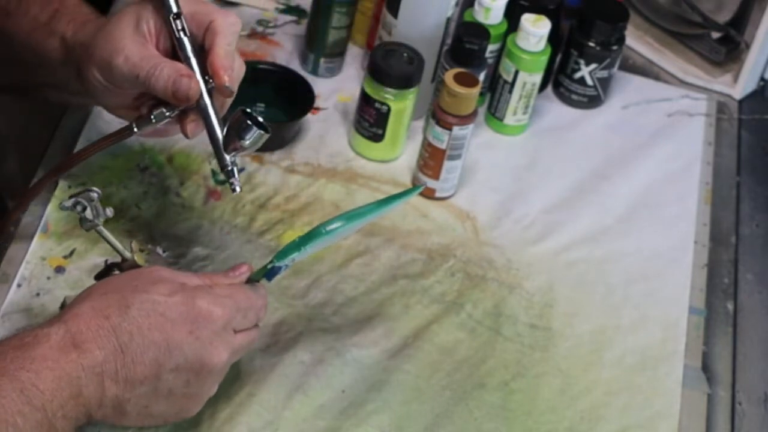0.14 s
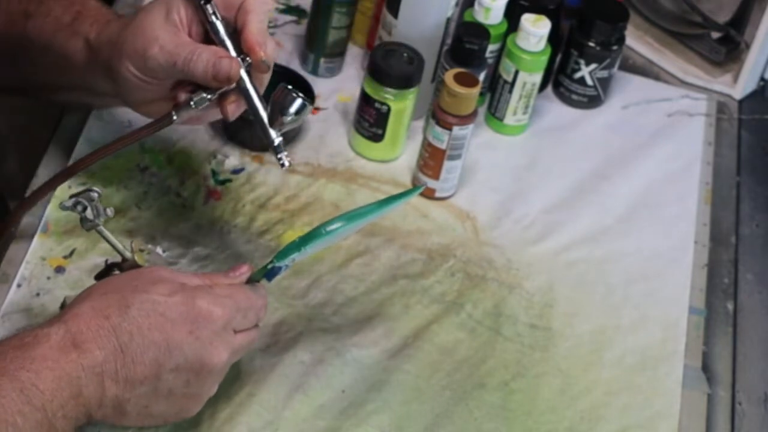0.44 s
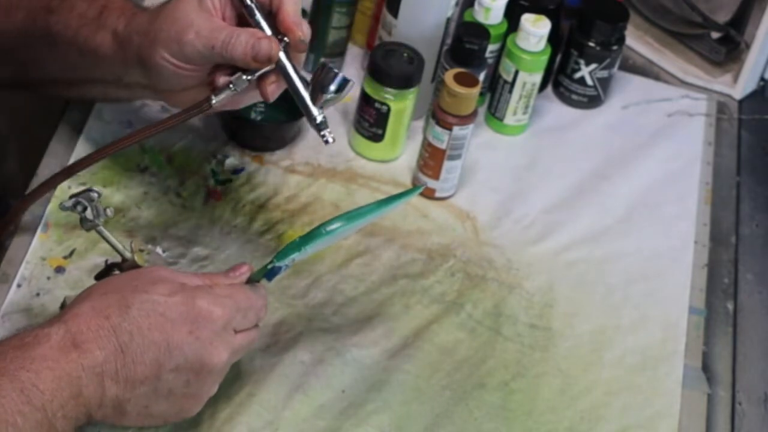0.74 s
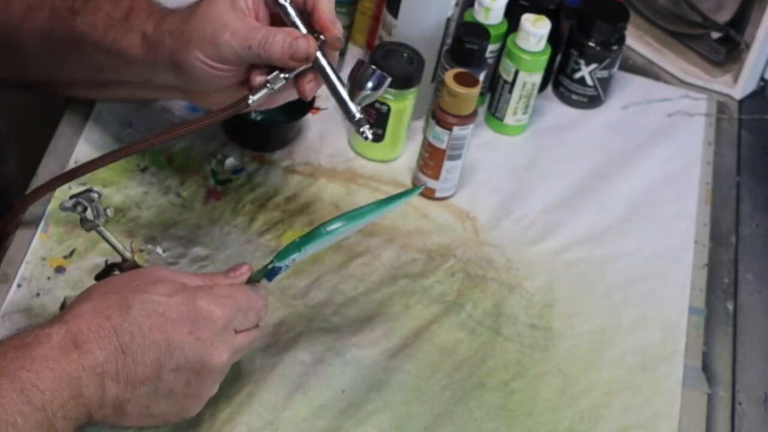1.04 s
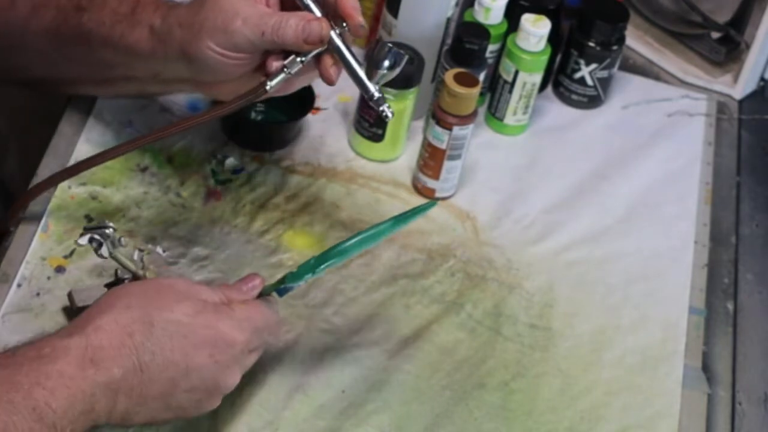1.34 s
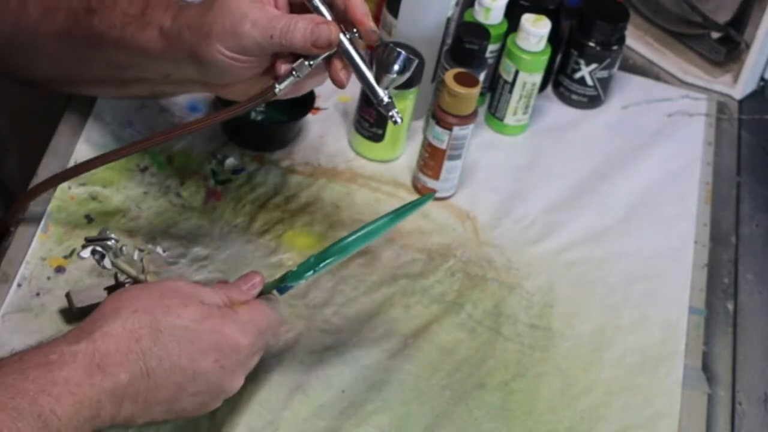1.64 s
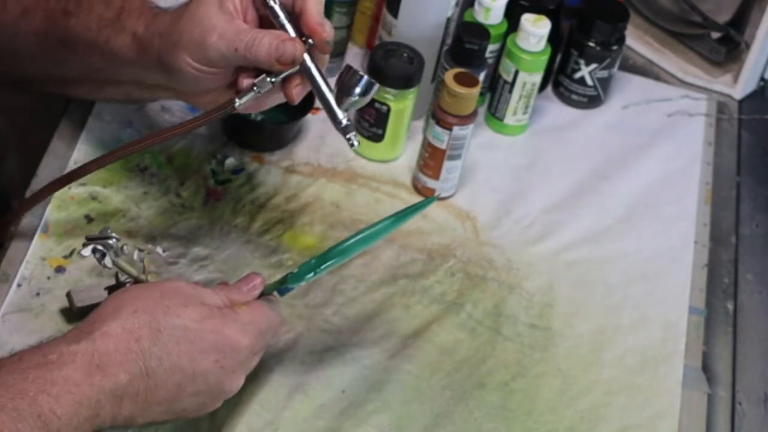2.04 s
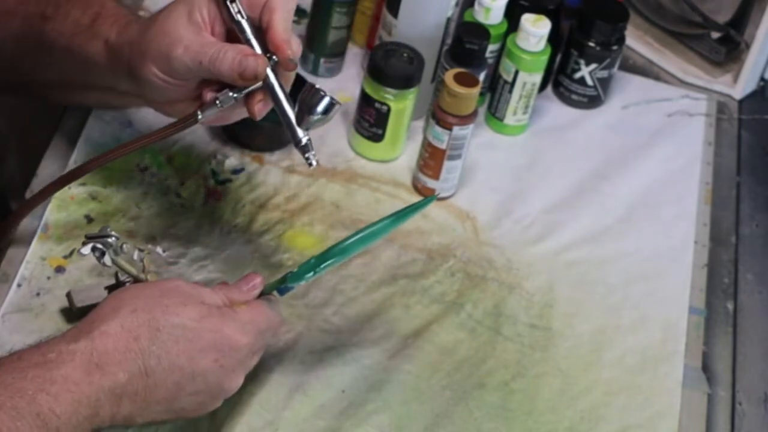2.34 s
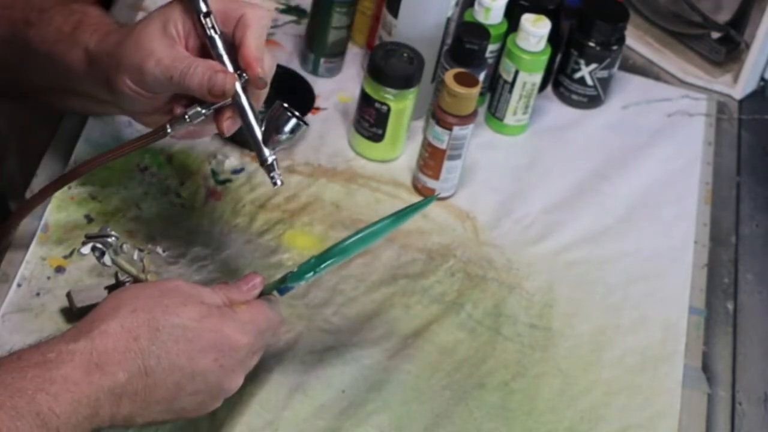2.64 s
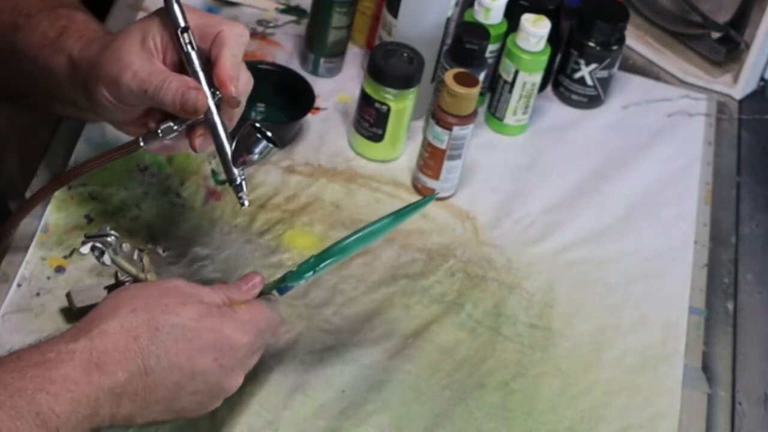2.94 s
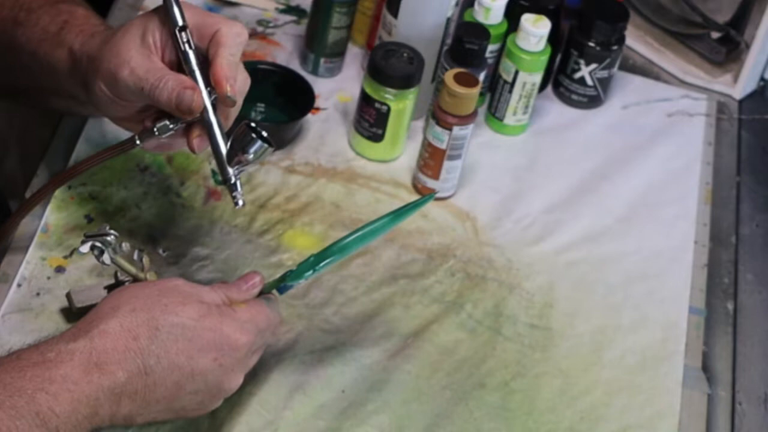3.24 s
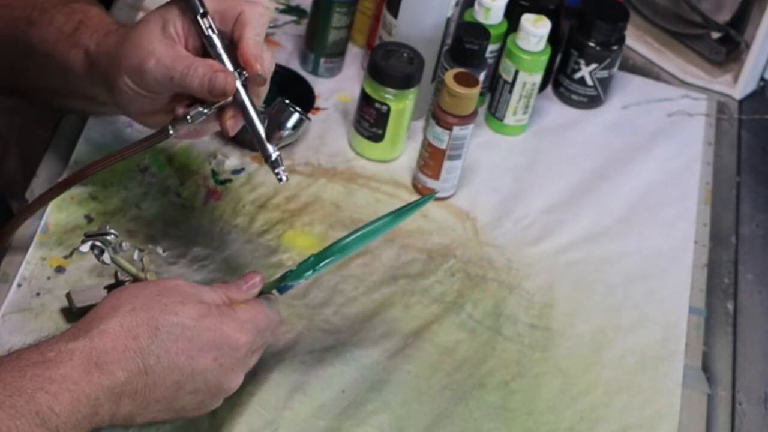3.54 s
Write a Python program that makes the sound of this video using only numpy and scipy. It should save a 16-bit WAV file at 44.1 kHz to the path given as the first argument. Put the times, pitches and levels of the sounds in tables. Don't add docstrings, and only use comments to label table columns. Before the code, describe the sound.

An airbrush hisses steadily, cuts out briefly, then resumes, over a small compressor's rattling buzz.

```python
import sys
import numpy as np
from scipy import signal
from scipy.fft import rfft, irfft
from scipy.io import wavfile

SR = 44100
rng = np.random.default_rng(int(sys.argv[2]) if len(sys.argv) > 2 else 0)


def natural_amplitude(level_db):
    exponent = np.asarray(level_db, float) / 20
    return 10 ** exponent


def unload_audio(sound):
    columns = np.transpose(np.atleast_2d(sound))
    steps = np.round(np.clip(columns, -1, 1) * 32767)
    wavfile.write(sys.argv[1], SR, steps.astype(np.int16))


N = 163170
T = np.arange(N) / SR
HZ = np.maximum(np.arange(N // 2 + 1) * SR / N, 1)
CUTOFF_HZ = 15780


def rms_one(x):
    return x / np.sqrt(np.mean(x ** 2))


def at_hz(points):
    hz, db = np.transpose(points)
    return natural_amplitude(np.interp(np.log(HZ), np.log(hz), db))


def bell(hz, width_hz):
    return 1 / (1 + (2 * (HZ - hz) / width_hz) ** 2)


def dips_and_lifts(resonances):
    return natural_amplitude(sum(db * bell(hz, width_hz) for hz, width_hz, db in resonances))


def drift(rate):
    r = np.exp(-80 * np.pi * rate / SR)
    slow = signal.lfilter([1], [1, -2 * r, r * r], rng.standard_normal(N // 40 + 1102))[1100:]
    return np.interp(np.arange(N) / 40, np.arange(len(slow)), rms_one(slow))


def noise(shape, flicker_db):
    white = rfft(rng.standard_normal(N)) * shape
    octave = np.log2(HZ / 40)
    total = np.zeros(N)
    for k in range(10):
        band = irfft(white * np.clip(1 - abs(octave - k), 0, 1), N)
        total += band * natural_amplitude(flicker_db * drift(9.3))
    return rms_one(total)


def ring(x, hz, width_hz):
    r, w = np.exp(-np.pi * width_hz / SR), 2 * np.pi * hz / SR
    poles = [1, -2 * r * np.cos(w), r * r]
    once = signal.lfilter([0, np.sin(w)], poles, x + 1e-18)
    return signal.lfilter([0, 2 * np.e * (1 - r) * np.sin(w)], poles, once)


# frequency in Hz, level in dB per Hz.
ROOM = [(25, 1), (60, -9), (200, -8), (1000, -11), (4000, -21), (16000, -32.5)]


def room():
    whine = natural_amplitude(-84) * np.sin(2 * np.pi * 14820 * T)
    return natural_amplitude(-56.5) * noise(at_hz(ROOM), flicker_db=1.0) + whine


MAINS_HZ = 60


def mains_hum():
    peak_s, rise_s, fall_s = 0.315, 0.045, 0.042
    surge = np.exp(-np.where(T < peak_s, (peak_s - T) / rise_s, (T - peak_s) / fall_s))
    hum = 2 * np.pi * MAINS_HZ * T
    return -natural_amplitude(-62 + 4) * np.cos(hum) - natural_amplitude(-43.5) * surge * np.sin(2 * hum)


# time in seconds, peak level in dB.
SPARKS = [
    (.124925, -8.5),
    (.125006, -.7),
    (.125488, -2.2),
]


def switch():
    width_s, rebound_db, rebound_s = .0000145, -27, .003
    snaps = sum(-natural_amplitude(db) * np.exp(-.5 * ((T - s) / width_s) ** 2) for s, db in SPARKS)
    after = np.clip(T - SPARKS[-1][0], 0, 1)
    return snaps + natural_amplitude(rebound_db) * (after > 0) * np.exp(-after / rebound_s)


START_S, STOP_S = .235, 3.607
# time in seconds, turns per second.
SPEED = [(.27, 28.55), (.6, 28.76), (1.2, 28.82), (2, 28.83), (2.4, 28.88), (2.9, 28.83), (3.7, 28.73)]


def shaft_turns():
    knock_s = 1.9368
    turns = np.cumsum(np.interp(T, *np.transpose(SPEED))) / SR
    return turns - np.interp(knock_s, T, turns)


# frequency in Hz, width in Hz, change in dB.
VALLEYS = [(315, 54, -8), (480, 64, -7.5), (596, 23.3, -19.5)]
# frequency in Hz, width in Hz, change in dB.
SECOND_VALLEY = (718, 24, -7)


def housing_valleys():
    return dips_and_lifts(VALLEYS + [SECOND_VALLEY])


# share of the turn after the main knock, level in dB,
# ring frequency in Hz, ring width in Hz.
VALVES = [
    (-.032, -27.8, 953, 186),
    (.222, -46, 996, 60),
    (.406, -39.1, 905, 63),
    (.731, -43.9, 1016.5, 60),
    (.858, -36.5, 750, 258),
]
# frequency in Hz, width in Hz, level in dB.
HOUSING = [(385.5, 32, -49), (549.5, 16, -58.5), (1064, 47, -51)]
# frequency in Hz, width in Hz, level in dB.
COLD_RING = [(747, 57, -42.5), (883, 48, -43.5)]


def valve_knocks(turns, cold, valleys):
    gain_db, scatter_db, jitter_s, cold_sag, top_hz = -0.5, 1.4, .00003, 0.019, 1300
    whole = np.arange(np.ceil(turns[0]), np.interp(STOP_S, T, turns))
    out = np.zeros(N)
    for k, (share, db, hz, width_hz) in enumerate(VALVES):
        luck = rng.standard_normal((len(whole), 2))
        at = (np.interp(whole + share, turns, T) + jitter_s * luck[:, 0]) * SR
        clicks = np.bincount(at.astype(int).clip(0), natural_amplitude(scatter_db * luck[:, 1]), N)
        loaded = ring(clicks * (1 - cold), hz, width_hz)
        flat = ring(clicks * cold, hz * (1 - cold_sag), width_hz)
        out += natural_amplitude(db + gain_db) * (loaded + flat)
        if k == 0:
            out += sum(natural_amplitude(d) * ring(clicks, f, w) for f, w, d in HOUSING)
            slack = sum(natural_amplitude(d) * ring(clicks * cold, f, w) for f, w, d in COLD_RING)
    return irfft(rfft(out) * valleys / (1 + (HZ / top_hz) ** 20), N) + slack


# order (cycles per turn), level in dB,
# partner level in dB, partner lead in cycles.
SHAFT = [(2, -66, -80, 0), (3, -58, -66, -.03), (4, -62, -61, .3), (5, -58, -62, .24), (6, -59, -58, .06),
         (7, -72, -67, .47), (8, -71, -71, .06)]
# order (cycles per turn), level in dB.
HIGH_ORDERS = [(60, -72), (90, -73), (125, -76)]


def shaft_tones(turns, cold):
    lag_turns, smear, wander_db = .85, .11, 1.2
    slip = 2 * MAINS_HZ * T - 4 * turns
    out = np.zeros(N)
    for order, db, partner_db, lead in SHAFT:
        cycle = order * (turns - lag_turns) + smear * order ** 2
        out += natural_amplitude(db + 3 + wander_db * drift(1.5)) * np.cos(2 * np.pi * cycle)
        out += natural_amplitude(partner_db + 3) * np.cos(2 * np.pi * (cycle + slip + lead))
    whine_db = -48.5 + 1.5 - 8 * cold + wander_db * drift(3.3)
    out -= natural_amplitude(whine_db) * np.cos(2 * np.pi * 20 * turns)
    return out + sum(natural_amplitude(db + 3) * np.cos(2 * np.pi * order * turns) for order, db in HIGH_ORDERS)


# frequency in Hz, level in dB per Hz.
RATTLE = [(25, -3), (60, -10.5), (380, -0.5), (560, -1), (930, -2.5), (1290, -23.5), (3700, -29),
          (16000, -66)]


def intake_and_rattle(turns, valleys):
    pulse = natural_amplitude(2 * np.cos(2 * np.pi * (turns - .08)))
    intake = natural_amplitude(-51) * noise(bell(890, 170) * valleys, flicker_db=1.5)
    return pulse * intake + natural_amplitude(-54) * noise(at_hz(RATTLE) * valleys, flicker_db=1.2)


def starting_song():
    middle_s, width_s, hz = .3, .024, 972
    swell = np.exp(-.5 * ((T - middle_s) / width_s) ** 2)
    return natural_amplitude(-38) * swell * np.sin(2 * np.pi * hz * T)


# time in seconds, level in dB, ring frequency in Hz.
RUN_DOWN = [
    (3.620, -34, 933),
    (3.645, -39, 1026),
    (3.665, -42, 996),
]


def last_strokes():
    return sum(natural_amplitude(db) * ring(np.arange(N) == int(s * SR), hz, 97) for s, db, hz in RUN_DOWN)


def compressor():
    rise_s, fall_db_per_s, load_s = .075, 150, 0.49
    turns, valleys = shaft_turns(), housing_valleys()
    cold = np.exp(-np.clip(T - START_S, 0, 9) / load_s)
    running = valve_knocks(turns, cold, valleys) + shaft_tones(turns, cold)
    running += intake_and_rattle(turns, valleys)
    power = np.clip((T - START_S) / rise_s, 0, 1) * natural_amplitude(-fall_db_per_s * np.clip(T - STOP_S, 0, 1))
    return running * power + starting_song() + last_strokes()


def bench(x):
    places, t60_s, echo_db = 9, 0.1, -4
    reflected = HZ > 1100
    place, out = T / T[-1] * (places - 1), 0
    for k in range(places):
        echo = rng.standard_normal(N) * natural_amplitude(-60 * np.minimum(T / t60_s, 4))
        echo = natural_amplitude(echo_db) * echo / np.sqrt(np.sum(echo ** 2))
        here = x * np.clip(1 - abs(place - k), 0, 1)
        out = out + rfft(here) * (1 + rfft(echo) * reflected)
    return irfft(out / np.sqrt(1 + natural_amplitude(2 * echo_db) * reflected), N)


# start in seconds, length in seconds,
# frequency in Hz, width in Hz, level in dB.
WHISTLES = [(1.773, 0.086, 3270, 120, -56), (1.77, 0.11, 4700, 150, -59), (2.29, 0.57, 3280, 110, -62.5),
            (2.42, .06, 6700, 300, -60), (2.476, 0.31, 2290, 120, -59.5), (2.95, 0.38, 4750, 120, -62),
            (3.25, 0.36, 2250, 120, -61)]


def whistles():
    white = rfft(rng.standard_normal(N))
    out = np.zeros(N)
    for s, length_s, hz, width_hz, db in WHISTLES:
        swell = np.sqrt(np.sin(np.pi * np.clip((T - s) / length_s, 0, 1)).clip(0))
        out += natural_amplitude(db) * swell * rms_one(irfft(white * bell(hz, width_hz), N))
    return out


def trigger():
    shut_s, open_s, shut_db_per_s, open_db_per_s = 1.865, 2.285, 697, 1500
    closed_db = np.minimum((T - shut_s) * shut_db_per_s, (open_s - T) * open_db_per_s)
    return natural_amplitude(-np.clip(closed_db, 0, 60))


# time in seconds, hiss level in dB, level in dB of the edge tone
# where it grazes the blade, level in dB of the low wash off the bench.
JET = [(0, -47.5, -54, -41), (.1, -46.5, -52, -40.5), (.3, -45, -56, -44), (.62, -44.5, -55, -52),
       (.75, -48, -61, -55), (.86, -44.5, -45, -39), (.96, -45.5, -54.5, -40), (1.36, -46.5, -52, -41),
       (1.66, -45.5, -43, -40.5), (1.77, -46, -53.5, -48.5), (1.85, -47.5, -67, -72), (2.29, -51, -68, -67),
       (2.4, -55.5, -80, -62), (2.43, -47.5, -75, -64), (2.6, -47.5, -50.5, -43.5), (2.8, -48, -79, -44),
       (3.5, -47, -52, -43.5), (3.62, -47.5, -55, -53)]
# frequency in Hz, level in dB per Hz.
HISS = [(760, -59), (1300, -11), (1700, -11), (2310, 0), (4190, -9.5), (12500, -10.5), (15600, -14.5),
        (16500, -67)]
# frequency in Hz, width in Hz, lift in dB.
NOZZLE = [(2460, 400, -4), (6220, 4200, 6), (8670, 520, 2), (11940, 1200, 3), (14400, 900, 3.5),
          (4030, 220, -3.5), (7750, 430, -6), (4460, 42, 0), (3170, 24, -4.5)]
# frequency in Hz, level in dB per Hz.
WASH = [(200, -35), (350, -7), (500, -6.5), (750, -1.5), (950, 2), (1150, -7.5), (1400, -15), (1900, -26)]


def airbrush():
    s, *columns = np.transpose(JET)
    hiss_db, edge_db, wash_db = [np.interp(T, s, c) for c in columns]
    colour = at_hz(HISS) * dips_and_lifts(NOZZLE) * (HZ > 900)
    hiss = natural_amplitude(hiss_db) * noise(colour, flicker_db=1.2)
    edge = natural_amplitude(edge_db) * noise(bell(2390, 1400), flicker_db=1.0)
    wash = natural_amplitude(wash_db) * noise(at_hz([(100, -33)] + WASH + [(4000, -53)]), flicker_db=.6)
    spit_s, spit_fade_s = 3.578, 0.16
    spit = (T > spit_s) * natural_amplitude(-47) * np.exp(-(T - spit_s) / spit_fade_s).clip(0, 1)
    spit = spit * noise(bell(5850, 1700), flicker_db=.7)
    return bench(trigger() * (whistles() + hiss + edge + wash + spit))


def scene():
    air = room() + mains_hum() + compressor() + airbrush()
    air = irfft(rfft(air) * (HZ < CUTOFF_HZ) / (1 + (42 / HZ) ** 4), N)
    snap = irfft(rfft(switch()) / (1 + (HZ / 16600) ** 100), N)
    return (air + snap) * np.ones((2, 1))


# lowest Hz, highest Hz.
STARVED = [(4200, 5100), (7600, 8200), (9500, 13500), (15200, 16000)]


def starve(dry):
    start_s, end_s = .109, .1215
    starved = np.clip(np.minimum(T - start_s, end_s - T) * 1000, 0, 1)
    bands = sum((HZ > low) * (HZ < high) for low, high in STARVED)
    return dry - starved * irfft(rfft(dry) * bands, N)


# frequency in Hz, level in dB per Hz.
MIC = [(30, 9), (60, -6), (150, -13), (500, -21.5), (1500, -25), (6000, -21.5), (14000, -24), (16000, -27)]


def microphone_hiss(dry):
    return natural_amplitude(-71.5) * np.array([noise(at_hz(MIC) * (HZ < CUTOFF_HZ), flicker_db=2.7) for _ in dry])


def gain_control():
    duck_db, release_s, fade_s, fade_db_per_s = 7, .035, 3.685, 400
    after = T - SPARKS[-1][0] - .0015
    duck = duck_db * np.clip(after * 500, 0, 1) * np.exp(-np.clip(after, 0, 9) / release_s)
    return natural_amplitude(-duck - fade_db_per_s * np.clip(T - fade_s, 0, 1))


def roll_off(x):
    return signal.sosfilt(signal.butter(12, 17840, fs=SR, output="sos"), x)


def record(dry):
    mix = (starve(dry) + microphone_hiss(dry)) * gain_control()
    return roll_off(mix)


dry = scene()
out = record(dry)
unload_audio(out)
```